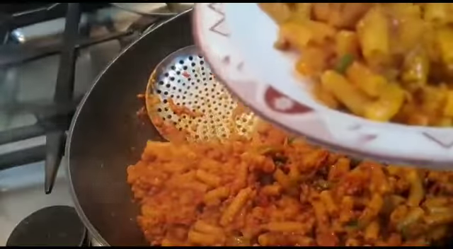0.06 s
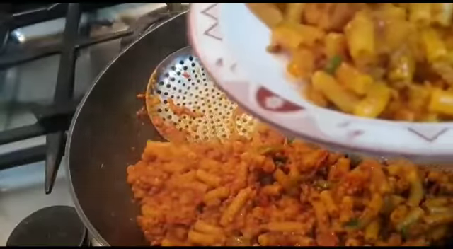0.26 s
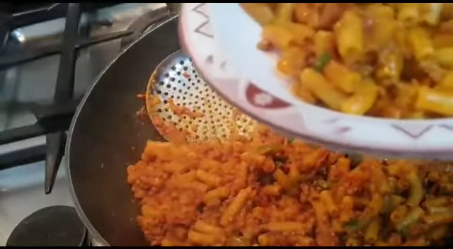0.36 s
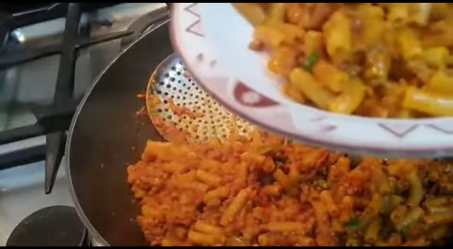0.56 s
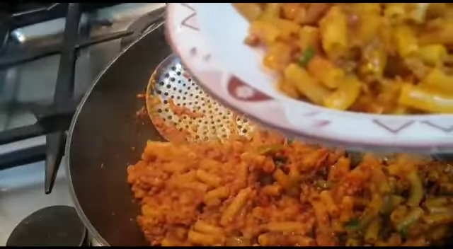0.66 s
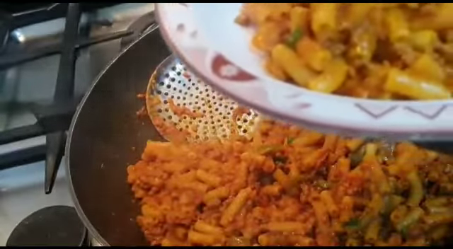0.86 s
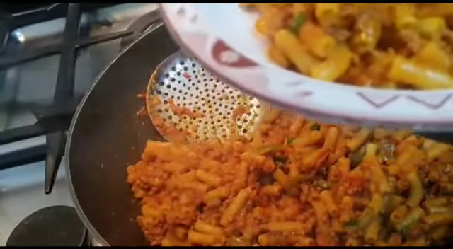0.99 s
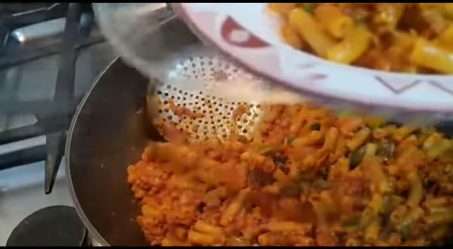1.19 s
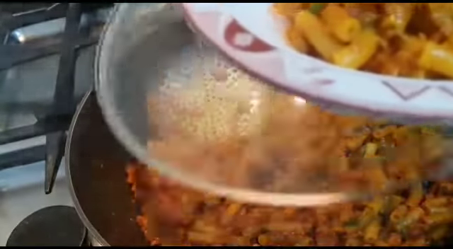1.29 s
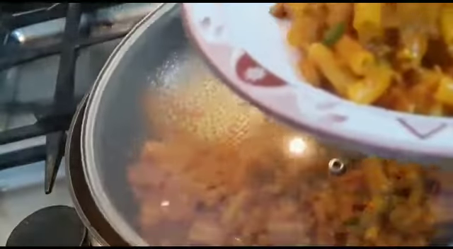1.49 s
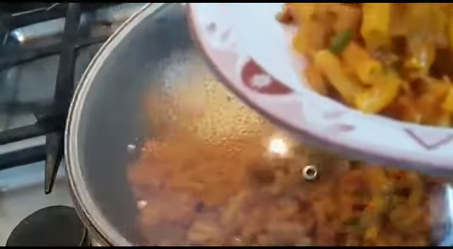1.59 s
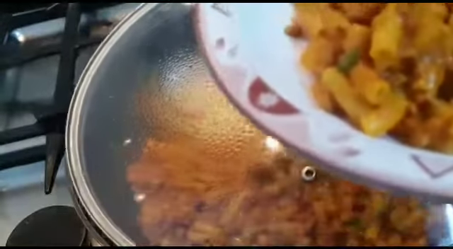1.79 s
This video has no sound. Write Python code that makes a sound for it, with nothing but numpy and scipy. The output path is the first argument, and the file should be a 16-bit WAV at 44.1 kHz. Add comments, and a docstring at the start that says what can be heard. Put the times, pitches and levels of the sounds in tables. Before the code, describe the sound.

A glass lid squeaks free with a brief ring, then clatters down onto a metal frying pan

```python
"""In a small kitchen with a low hum, a glass lid with a steel rim is dragged off its resting place.
The rim squeaks (an unsteady tone with rasp), slips free and rings (decaying tones and coloured noise).
A second later the lid lands on a metal frying pan, rocks through a few knocks and slides into its seat
(grating noise). Food sizzles and spits faintly in the pan: hiss, random crackles and short pops."""
import sys
import numpy as np
from scipy import signal
from scipy.fft import rfft, irfft
from scipy.io import wavfile
from scipy.ndimage import uniform_filter1d

SR = 44100
rng = np.random.default_rng(int(sys.argv[2]) if len(sys.argv) > 2 else 0)


def unload_audio(sound):
    """Save the sound as a 16-bit wav file, at the path given as the first command line argument."""
    columns = np.transpose(np.atleast_2d(sound))
    # keep every value between -1 and 1, then stretch to whole-number steps
    steps = np.round(np.clip(columns, -1, 1) * 32767)
    wavfile.write(sys.argv[1], SR, steps.astype(np.int16))


N = 81585  # length in samples

# All levels are relative: later gains set the final loudness.
# t60_s is the time a sound takes to fade by 60 dB.


def amp(db):
    """Turn decibels into a plain multiplier."""
    return 10 ** (np.asarray(db) / 20)


def clock():
    """Time of each sample in seconds."""
    return np.arange(N) / SR


def sine(hz, start=0, wobble=0):
    """Pure tone whose phase is zero at the start time; wobble shifts the phase in radians."""
    return np.sin(2 * np.pi * hz * (clock() - start) + wobble)


def curve(rows, axis=1):
    """One column of a table, joined by straight lines in time."""
    rows = np.array(rows)
    return np.interp(clock(), rows[:, 0], rows[:, axis])


def colour(x, spectrum):
    """Filter through (pitch_hz, level_db) points without pre-echo; white noise keeps its rms."""
    hz, db = np.array(spectrum).T
    size = 2 ** 17
    bins_hz = np.maximum(np.fft.rfftfreq(size, 1 / SR), 1)
    gain = amp(np.interp(np.log(bins_hz), np.log(hz), db))
    gain = gain / np.sqrt(np.mean(gain ** 2))
    # Folding the cepstrum forward in time makes the filter respond only after its input.
    cepstrum = irfft(np.log(gain))[:size // 2]
    cepstrum[1:] *= 2
    response = np.exp(rfft(cepstrum, size))
    return irfft(rfft(x, size) * response)[:N]


def noise(spectrum):
    """Coloured noise, rms 1."""
    return colour(rng.standard_normal(N), spectrum)


def walk(rate):
    """Smooth random drift with a spread of 1, given about `rate` new values a second."""
    step = max(int(SR / rate), 1)
    held = np.repeat(rng.standard_normal(N // step + 1), step)
    drift = uniform_filter1d(held, step)[:N]
    return drift / drift.std()


def fade(start, t60, attack=0.00046):
    """Quick rise, then exponential decay (all in seconds)."""
    age = np.maximum(clock() - start, 0)
    rise = 1 - np.exp(-age / attack)
    return rise * np.exp(-np.log(1000) * age / t60)


def energy(blows, t60, attack=0.00038):
    """Envelope of (start_s, level_db) blows whose energies add and drain away."""
    power = np.zeros(N)
    for start, db in blows:
        power[int(start * SR)] += amp(db) ** 2
    keep = np.exp(-2 * np.log(1000) / (t60 * SR))
    soften = np.exp(-1 / (attack * SR))
    poles = np.convolve([1, -keep], [1, -soften])
    return np.sqrt(signal.lfilter([1 - soften], poles, power + 1e-30))


def ring(blows, modes):
    """Decaying modes fed by the blows; each wavers a little in phase, so its tone is less pure."""
    waver_rad, waver_rate = 0.43, 32  # spread of the phase, new values per second
    total = np.zeros(N)
    for hz, db, t60 in modes:
        tone = sine(hz, wobble=waver_rad * walk(waver_rate))
        total += amp(db) * energy(blows, t60) * tone
    return total


def wash(blows, spectrum, t60, tail_db, tail_t60):
    """Modes too dense to tell apart: a short crash of noise, then their tail in the room."""
    crash = energy(blows, t60)
    tail = amp(tail_db) * energy(blows, tail_t60, attack=0.0061)
    return colour(rng.standard_normal(N) * np.hypot(crash, tail), spectrum)


def click(blows, spectrum):
    """The instant of contact: one sharp pulse for each (start_s, level_db) blow."""
    pulses = np.zeros(N)
    for start, db in blows:
        pulses[int(start * SR)] += amp(db)
    return colour(pulses, spectrum)


def kitchen():
    """Low room noise and an appliance hum whose tones waver in level and phase."""
    # colour of the room noise: pitch_hz, level_db (per Hz)
    room_colour = [(15, -43), (25, -13), (64, 3), (115, 5), (196, -11.5), (309, -5), (415, -11.5),
                   (769, -16), (2240, -35.5), (3540, -43.5), (4150, -38), (5140, -33), (15000, -38.5)]
    # tones of the hum: pitch_hz, level_db (rms, before the waver)
    hum_tones = [(60, -63.5), (121, -70.5), (181, -74.5)]
    room_db = -59
    total = amp(room_db) * noise(room_colour)
    for hz, db in hum_tones:
        level = amp(db + 2 * walk(6.3))
        total += level * np.sqrt(2) * sine(hz, wobble=.5 * walk(15))
    return total


def bumps():
    """The pan and the hob under it answer with short, low notes that rise softly and decay."""
    # dull bumps: start_s, pitch_hz, level_db, t60_s
    bump_notes = [(0.107, 431, -35, 0.046), (0.282, 72.5, -37, 0.47), (.303, 311.6, -26.5, 0.12),
                  (0.849, 186, -36.5, 0.063), (1.454, 75.4, -41, 0.5), (1.667, 74.4, -46, 0.41),
                  (1.822, 355, -37.5, 0.13)]
    attack_s = 0.011
    total = np.zeros(N)
    for start, hz, db, t60 in bump_notes:
        total += amp(db) * fade(start, t60, attack=attack_s) * sine(hz, start)
    return total


def sizzle():
    """Tiny bursting bubbles: random pulses crackle over a fluttering hiss."""
    # level of the sizzle over time: time_s, level_db
    sizzle_level = [(0, -72.5), (.06, -61.5), (.13, -56), (.19, -56.5), (.45, -54.5), (.52, -61.5),
                    (.59, -78.5), (.625, -68.5), (.72, -67.5), (.77, -57), (.9, -65.5), (1.0, -63),
                    (1.19, -59.5), (1.25, -72), (1.35, -69.5), (1.42, -90.5), (1.7, -68.5), (1.85, -52)]
    # colour of the hiss: pitch_hz, level_db (per Hz)
    hiss_colour = [(300, 9), (1200, -2), (2200, -4.5), (3400, -9), (4400, 1), (5800, 1), (7800, -9),
                   (10000, -6), (13000, -30.5), (15500, -10.5)]
    crackle_colour = [(1000, -12), (4000, -3.0), (10500, 2), (15500, -9.0)]  # pitch_hz, level_db
    bursts_per_s, crackle_db, crackle_spread_db = 900, -7.5, 4.5
    happens = rng.random(N) < bursts_per_s / SR
    sign = rng.choice([-1, 1], N)
    size = amp(crackle_spread_db * np.minimum(rng.exponential(size=N), 5))
    bursts = happens * sign * size
    crackle = colour(bursts / bursts.std(), crackle_colour)
    hiss = noise(hiss_colour) * amp(2.6 * walk(49))
    return (hiss + amp(crackle_db) * crackle) * amp(curve(sizzle_level))


def spits():
    """Larger bubbles of fat burst: each pops at its own pitch and throws a brief spray of noise."""
    # loud spits of fat: start_s, pitch_hz, level_db
    spit_list = [(0.13, 10000, -36.5), (0.1713, 11100, -37), (.2365, 10000, -37), (0.386, 12500, -40),
                 (0.4215, 10000, -34.5), (.446, 9500, -35), (.46, 9500, -40), (.476, 9500, -40),
                 (.493, 10000, -45.5), (0.529, 8070, -49), (0.5417, 8830, -41.5), (.612, 10000, -50),
                 (0.673, 10130, -44.5), (.68, 6400, -47.5), (0.7598, 9600, -28), (.798, 5030, -46),
                 (0.928, 8040, -45.5), (1.159, 9500, -51), (1.339, 6800, -48)]
    # colour of the spray: pitch_hz, level_db (per Hz)
    spray_colour = [(800, -25), (3000, -8), (6000, -7), (8800, 3.5), (11500, -3), (13000, -14.5),
                    (15500, -15.5)]
    pop_db, pop_t60_s = 4, .0006
    spray_db, spray_t60_s = -5, .002
    pops = np.zeros(N)
    for start, hz, db in spit_list:
        pops += amp(db) * fade(start, pop_t60_s, attack=.00003) * sine(hz, start)
    blows = [(start, db) for start, hz, db in spit_list]
    spray = wash(blows, spray_colour, t60=spray_t60_s, tail_db=-30.5, tail_t60=.1)
    return amp(pop_db) * pops + amp(spray_db) * spray


def lid_slides():
    """The rim grates along the edge of the pan: coloured noise with an uneven level."""
    # level of the slide into the seat: time_s, level_db
    slide_level = [(1.70, -66), (1.77, -55.5), (1.81, -49.5), (1.85, -48)]
    # colour of the grating: pitch_hz, level_db (per Hz)
    slide_colour = [(80, -16), (170, -1.5), (350, 4.5), (600, -4), (1200, -10.5), (3200, -14), (4400, -8),
                    (7000, -14.5), (9000, -24), (15000, -29)]
    started = clock() > slide_level[0][0]
    return started * noise(slide_colour) * amp(curve(slide_level) + 1.7 * walk(150))


def lid_lands():
    """The lid rocks on the pan; each point of contact gives the main mode its own pitch and damping."""
    # knocks, with the pan's main mode:
    # start_s, pitch_hz, t60_s, body_db, clatter_db, clink_db, thud_db
    knocks = [(1.4489, 447.6, 0.088, -22, -36.5, -33, -25.5), (1.478, 419, 0.087, -34.5, -44, -38.5, -38),
              (1.517, 440, .06, -52, -52, -44, -58), (1.5328, 466, 0.14, -24.5, -30.5, -40.5, -42),
              (1.5887, 367.4, 0.07, -24, -30.5, -29.5, -32.5), (1.598, 447, 0.1, -26, -39, -41, -44),
              (1.610, 438, 0.037, -32, -38.5, -37.5, -34), (1.63, 410, .04, -51, -55, -48, -41),
              (1.667, 485.6, .08, -29, -42.5, -40.5, -42)]
    # modes of lid and pan together: pitch_hz, level_db, t60_s
    seated_modes = [(244.7, -9, 0.27), (314.3, -12, 0.57), (526, -11.5, .3), (652, -7, 0.31),
                    (785, -1, 0.2), (831.7, -2.5, 0.16), (1012, -10.5, 0.097), (1174, -13, 0.22),
                    (1260, -11.5, 0.2)]
    # high modes of the pan's rim: pitch_hz, level_db, t60_s
    pan_rim_modes = [(1730, -17, 0.51), (2030, -11.5, 0.24), (2400, -9, 0.13), (2530, -22.5, .32),
                     (3100, -14, 0.2), (4240, -16, 0.21), (4870, -19, 0.13), (5170, -10.5, 0.074),
                     (5800, -16.5, 0.096), (6320, -12.5, 0.14), (7200, -22, .25), (7600, -15, 0.1)]
    # dense ring of the covered pan, from low to high: pitch_hz, level_db (per Hz)
    thud_colour = [(35, -55), (70, -15), (110, 7), (320, 8.5), (480, 11), (620, -7.5), (900, -31.5)]
    clatter_colour = [(200, -12.5), (450, 7.5), (850, 2.5), (1250, -2), (1550, -8), (2300, -7.5),
                      (3200, -12.5), (5000, -15.5), (8000, -55)]
    clink_colour = [(700, -38.5), (1800, 4.5), (2400, 2.5), (2800, 2.5), (4500, 1.5), (6000, 5), (7700, -1),
                    (8800, -14), (11000, -33), (15500, -40)]
    body_tail_db, body_tail_t60_s = -9.5, 0.24

    body = np.zeros(N)
    clatter, clink, thud = [], [], []
    for start, hz, t60, body_db, clatter_db, clink_db, thud_db in knocks:
        tail = amp(body_tail_db) * fade(start, body_tail_t60_s)
        body += amp(body_db) * np.hypot(fade(start, t60), tail) * sine(hz, start)
        clatter.append((start, clatter_db))
        clink.append((start, clink_db))
        thud.append((start, thud_db))

    low = amp(1.0) * wash(thud, thud_colour, t60=0.041, tail_db=-9.5, tail_t60=0.34)
    middle = amp(-4.0) * ring(clatter, seated_modes)
    middle += amp(0.7) * wash(clatter, clatter_colour, t60=0.024, tail_db=-8, tail_t60=.3)
    top = amp(-4.5) * ring(clink, pan_rim_modes)
    top += amp(-0.5) * wash(clink, clink_colour, t60=0.033, tail_db=-13.0, tail_t60=0.26)
    contact = amp(4) * click(clink, clink_colour) + amp(16.5) * click(clatter, clatter_colour)
    return body + low + middle + top + contact


def lid_lifted():
    """The rim jolts free and the lid rings in the air: separate modes over a dense wash."""
    # jolts of the rim as it slips free: start_s, body_db, clink_db
    slips = [(0.2506, -18, -34.5), (0.2545, -15, -22), (0.258, -21.5, -33.5), (0.2765, -30.5, -37),
             (.304, -26, -41.5), (.366, -50, -61)]
    # modes of the free lid: pitch_hz, level_db, t60_s
    free_modes = [(182, -19.5, 0.33), (306.1, -16, 0.35), (368, -14.5, .24), (417.3, -12.5, 0.16),
                  (475, -8, .15), (526, -6.5, .15), (656, -4, 0.087), (709, -3.5, .12), (758, -3, .15),
                  (820, -7, 0.12), (1101.6, -17, 0.35), (1161, -16.5, 0.28), (1268, -19, 0.27)]
    # high modes of the free steel rim: pitch_hz, level_db, t60_s
    rim_modes = [(1940, -9, .28), (2124, -10.5, .26), (2232, -5.5, 0.22), (3177, -7.5, 0.22),
                 (3720, -11.5, .22), (3870, -10, .27), (3936, -10, .3), (4010, -8, 0.34),
                 (5420, -8.5, 0.25), (6480, -17, .28), (6680, -15, 0.331), (7130, -18.5, .36),
                 (6002, -13.5, .25)]
    # dense ring of the free lid, low then high: pitch_hz, level_db (per Hz)
    body_colour = [(60, -26.5), (140, -8), (220, -11), (450, -2), (780, 2.5), (950, -5.5), (1250, -11),
                   (1600, -30), (3000, -63.5)]
    clink_colour = [(600, -29.5), (1200, -11), (1650, -0.5), (2200, 1), (2550, -5), (3200, 3.5),
                    (3500, -4.5), (3950, 7), (4600, -5), (6900, 3), (8200, -6), (10000, -23.5),
                    (12000, -15.5), (14500, -12), (16000, -8)]
    body = [(start, body_db) for start, body_db, clink_db in slips]
    clink = [(start, clink_db) for start, body_db, clink_db in slips]
    low = amp(-3.5) * ring(body, free_modes)
    low += amp(-4.0) * wash(body, body_colour, t60=0.1, tail_db=-10.5, tail_t60=0.37)
    high = amp(-7.5) * ring(clink, rim_modes)
    high += wash(clink, clink_colour, t60=0.086, tail_db=-9, tail_t60=.33)
    return low + high


def squeak():
    """The rim sticks and slips at an unsteady rate, with a rasp on every cycle."""
    # squeak of the dragged rim: time_s, pitch_hz (before jitter), tone_db (rms), rasp_db
    squeak_path = [(.12, 591.4, -87, -74), (.184, 591.4, -59.5, -53.5), (.197, 605, -35.5, -51),
                   (.22, 617.5, -29.5, -41.5), (.247, 606.6, -26.5, -34), (.255, 616.3, -18, -29.5),
                   (.267, 655.7, -18.5, -29.5), (.281, 599.6, -22, -37), (.288, 608.4, -36.5, -53),
                   (.303, 640, -23.5, -41), (.325, 598, -31, -33.5), (.345, 626.3, -66, -57),
                   (.369, 647, -35, -46), (.378, 640, -51, -52), (.386, 645, -36, -47),
                   (.41, 618, -64.5, -62), (.436, 606.2, -46.5, -63), (.47, 614, -83.5, -68)]
    # colour of the rasp: pitch_hz, level_db (per Hz)
    rasp_colour = [(100, -22.5), (200, -2), (380, -11), (490, 3.5), (800, -1), (950, -9), (1500, -18.5),
                   (3000, -19), (4100, -19.5), (7000, -22.5), (9500, -43.5), (15500, -36)]
    jitter = .02  # spread of the pitch, as a fraction
    pitch_hz = curve(squeak_path) * (1 + jitter * walk(200))
    phase = 2 * np.pi * np.cumsum(pitch_hz) / SR
    tone = np.sqrt(2) * np.sin(phase)
    # The noise swells and vanishes once per cycle.
    rasp = colour(rng.standard_normal(N) * (1 + np.cos(phase)), rasp_colour)
    sounding = (clock() > squeak_path[0][0]) & (clock() < squeak_path[-1][0])
    tone_level = amp(curve(squeak_path, axis=2))
    rasp_level = amp(curve(squeak_path, axis=3))
    return sounding * (tone_level * tone + rasp_level * rasp)


def scene():
    """All sources added into one channel."""
    background = kitchen() + bumps() + sizzle() + spits()
    lid = lid_slides() + lid_lands() + lid_lifted() + squeak()
    return (background + lid)[None]


def record(dry):
    """The recorder cuts the deep bass and the top."""
    low_cut_hz, top_hz = 44.6, 15600
    high_pass = signal.butter(4, low_cut_hz, "high", fs=SR, output="sos")
    low_pass = signal.ellip(10, .2, 80, top_hz, fs=SR, output="sos")  # ripple and stop depth in dB
    thin = signal.sosfilt(high_pass, dry)
    return signal.sosfilt(low_pass, thin)


dry = scene()
out = record(dry)
unload_audio(out)
```